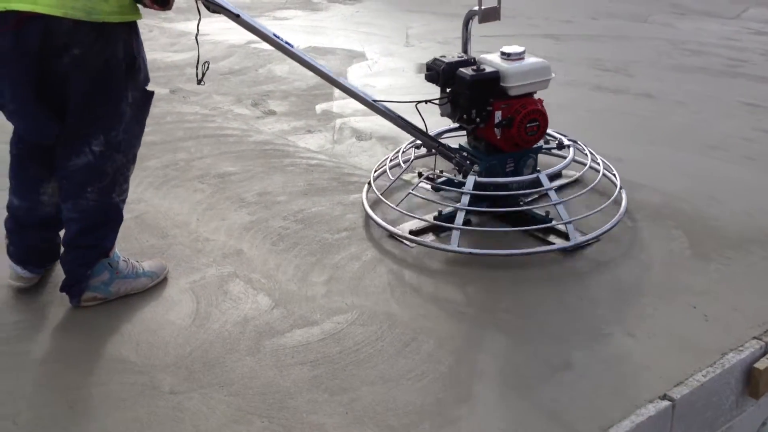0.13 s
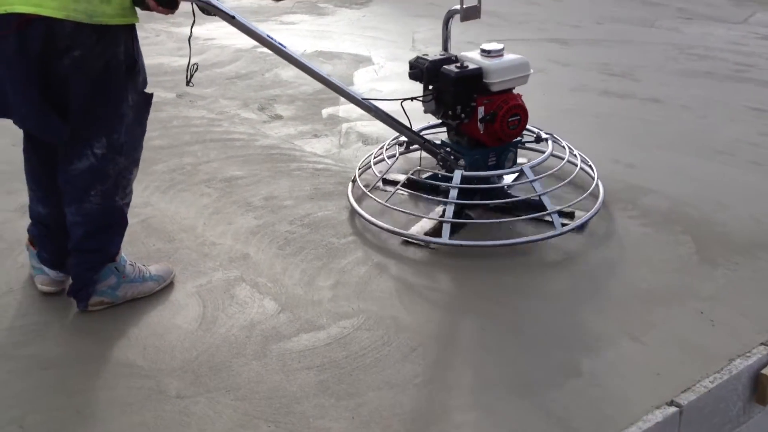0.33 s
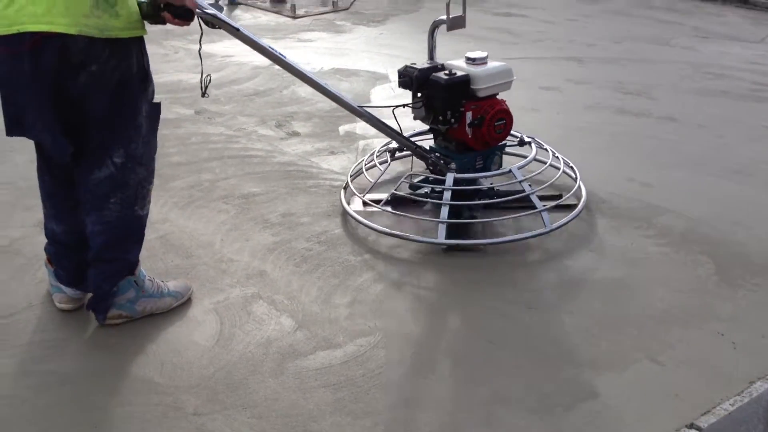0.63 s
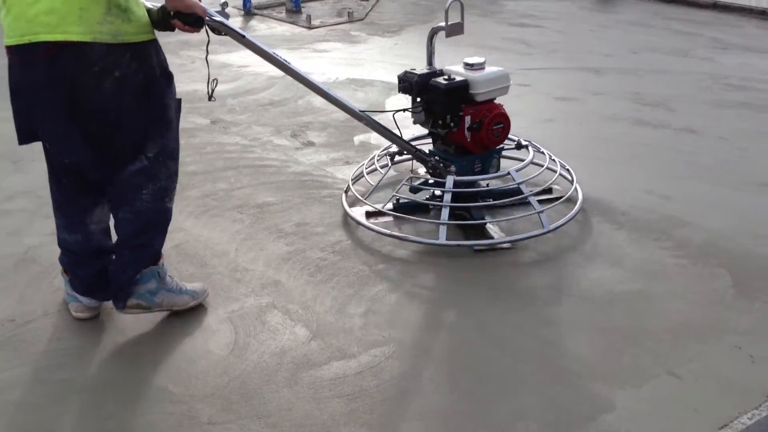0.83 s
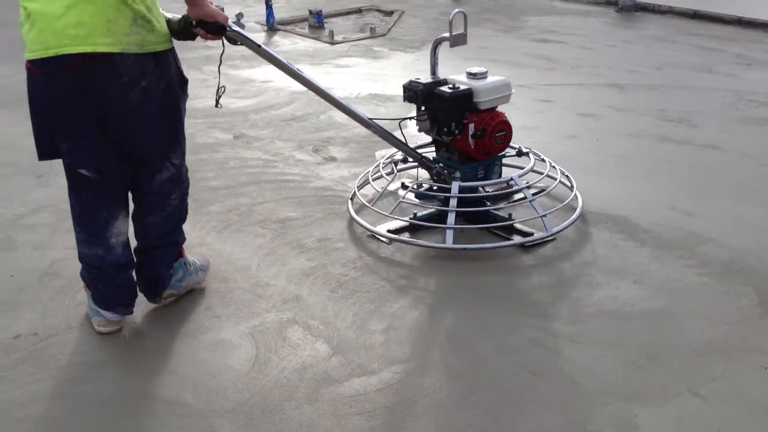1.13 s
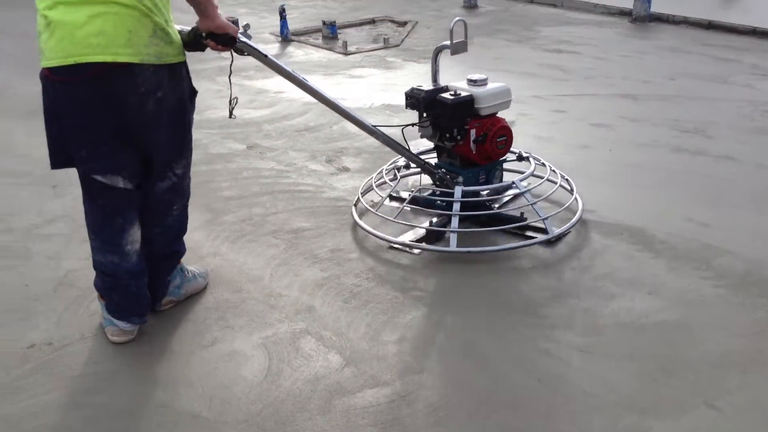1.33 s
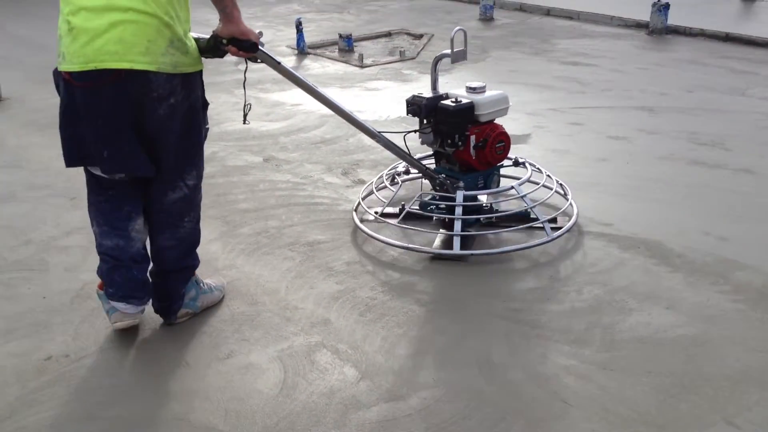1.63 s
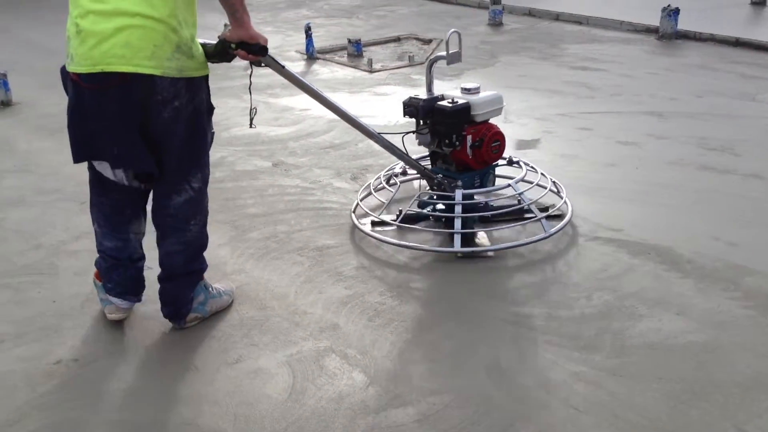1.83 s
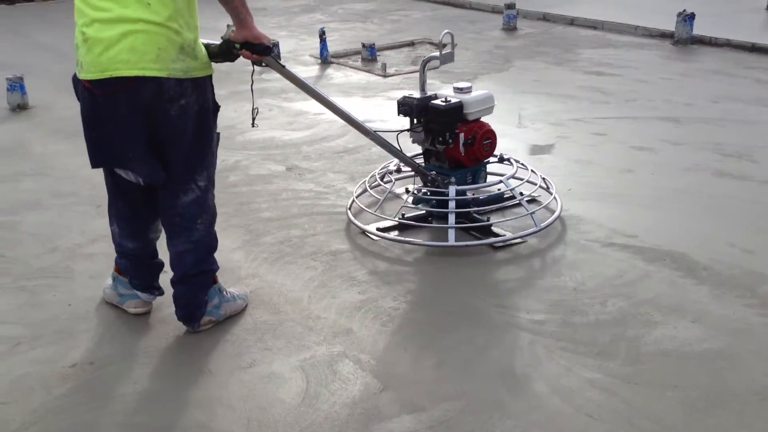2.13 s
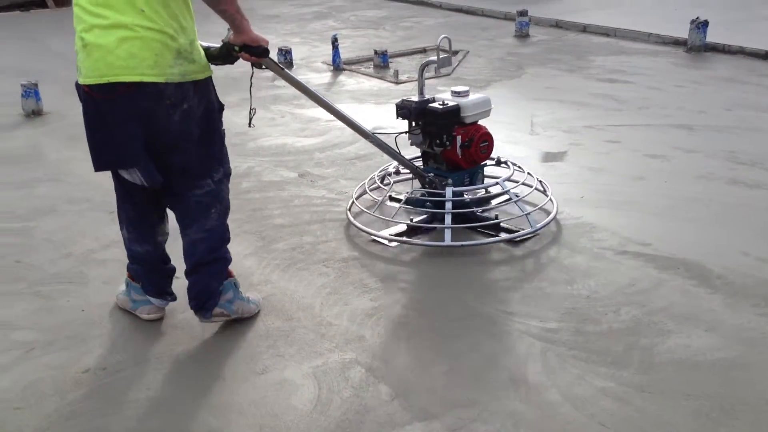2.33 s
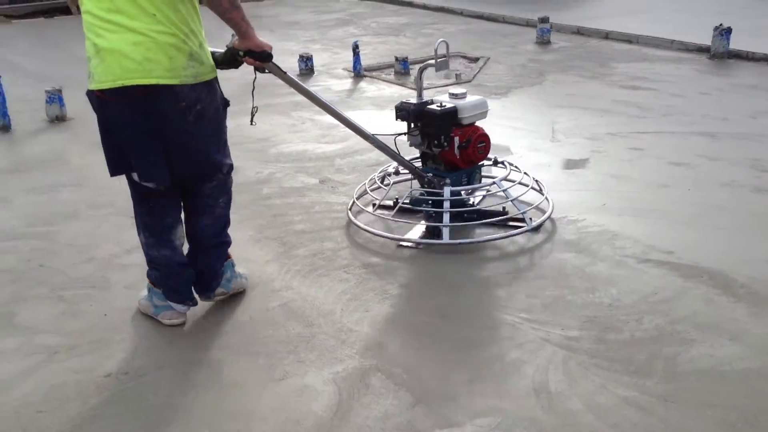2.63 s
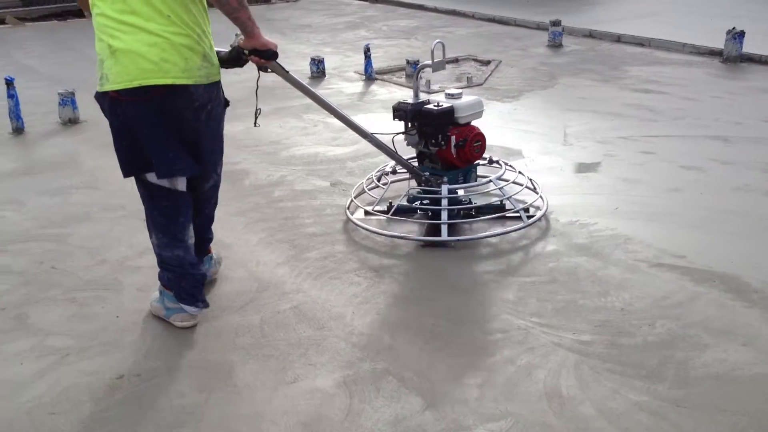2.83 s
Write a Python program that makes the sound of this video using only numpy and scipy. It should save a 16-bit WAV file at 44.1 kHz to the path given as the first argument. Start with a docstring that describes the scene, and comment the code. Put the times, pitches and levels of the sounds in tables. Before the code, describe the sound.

A small petrol engine runs continuously for about three seconds, its rough, buzzing drone pulsing about 31 times a second under dense metallic clatter. Steel blades add bright gritty hiss, swelling gently about eight times a second, fading to steadier. Sharp knocks and clacks scatter from 0.1 to 1.2 seconds, pause, then cluster duller from 2.1 to 2.9. Faint outdoor airflow and distant roar sit behind; mono, thin in deep bass.

```python
"""Outdoors, a wet concrete slab: a walk-behind power trowel heard by one microphone.
A single-cylinder four-stroke fires about 31 times a second: summed sine orders make the muffler drone,
random taps and one rap per firing ring casing resonances for the clatter.
Four steel blades sweep the slab: filtered random grains hiss, swelling with each pass; now and then
a blade knocks on a stone, as decaying sines. Shaped noise adds airflow and distant site roar."""
import sys
import numpy as np
from scipy import signal
from scipy.fft import rfft, irfft
from scipy.io import wavfile

SR = 44100
rng = np.random.default_rng(int(sys.argv[2]) if len(sys.argv) > 2 else 0)


def invert_db(x):
    """Field ratio 10**(x/20) for x, a level in decibels (scalar or array-like)."""
    u = np.asarray(x, float) / 20
    return 10 ** u


def file_out(sig):
    """Save sig as 16-bit WAV at sys.argv[1]."""
    # one column per channel
    cols = np.atleast_2d(sig).T
    # limit, then scale
    lim = np.clip(cols, -1, 1)
    pcm = np.round(lim * 32767).astype(np.int16)
    wavfile.write(sys.argv[1], SR, pcm)


N = 132300

# Engine speed. Each row: time in seconds, firings per second.
FIRING_RATE = [(0.05, 30.6), (0.43, 30.4), (0.59, 30.8), (1.34, 30.9), (1.49, 30.8), (2.22, 30.8),
               (2.55, 31.0), (2.79, 30.7), (2.95, 30.7)]
# Drone levels. Each row: time in seconds, base level of the minor orders, then levels of orders 5, 8, 11 in dB.
ORDER_LEVELS = [(0.05, -37, -34, -28.5, -39), (0.4, -36, -30.5, -26.5, -35.5), (0.59, -36, -32, -27, -33),
                (0.91, -32, -32, -29, -37), (1.76, -32, -29, -28.5, -33), (2.16, -33.5, -29, -28, -35),
                (2.4, -32, -28, -29.5, -31.5), (2.57, -30.5, -28.5, -30.5, -36.5),
                (2.88, -33.5, -29, -26, -29), (2.95, -33, -27.5, -27.5, -34.5)]
# Muffler spectrum. Each row: order (multiple of the firing rate), relative level in dB (unused for 5, 8, 11).
EXHAUST_ORDERS = [(1, -61), (2, -31.5), (3, -29), (4, -12), (5, -2), (6, -6.5), (7, -8.5), (8, 0), (9, -9),
                  (10, -6.5), (11, -4), (12, -17.5), (13, -14), (14, -16), (15, -39), (16, -18.5),
                  (17, -29), (19, -24), (20, -24), (21, -24.5)]
# Casing resonances. Each row: centre in Hz, width in Hz, relative gain in dB,
# share of the taps pulsing with each firing, lag behind the firing in cycles.
CASING_MODES = [(780, 79, -9.5, 0.15, 0.14), (870, 59, -2, 0.068, 0.03), (1023, 152, -5, 0.08, 0.3),
                (1380, 210, -16, 0.44, 0.085), (1480, 92, 4, 0.3, 0.14), (1507, 39, 8, 0.54, 0.42),
                (1715, 220, 0, 0.55, 0.5), (2130, 49, 2.5, 0.21, 0.35), (2304, 44, 11, 0.51, 0.4),
                (2377, 170, 0.5, 0.83, 0.12), (3300, 69, -4.5, 0.24, 0.42)]
# Relative clatter levels. Each row: time in seconds, level below 1.2 kHz, at 1.2-1.9 kHz, above, in dB.
CLATTER_LEVELS = [(0.05, -31, -33, -27), (0.16, -26.5, -31.5, -27), (0.29, -31, -26.5, -32),
                  (0.33, -27, -28, -31), (1.2, -27.5, -28.5, -25), (2.46, -31, -29.5, -27),
                  (2.9, -31, -27.5, -26.5), (2.95, -29, -27, -27)]
# Relative blade hiss levels. Each row: time in seconds, level below 6 kHz, at 6-9.5 kHz, above, in dB.
HISS_LEVELS = [(0.05, -28, -27.5, -29.5), (0.35, -27, -26, -27), (0.63, -28, -27, -28),
               (0.94, -29.5, -29, -29.5), (1.46, -29, -28, -31), (1.81, -28, -27.5, -29.5),
               (2.21, -29, -28.5, -31.5), (2.6, -28.5, -29, -30.5), (2.95, -28.5, -28, -31)]
# Hiss spectrum. Each row: frequency in Hz, relative density in dB per Hz.
HISS_SPECTRUM = [(1650, -14.5), (2800, -0.5), (3320, 0), (3540, -7.5), (3850, -1.5), (4220, -8),
                 (5150, -2.5), (6110, -4), (7240, -1), (8650, -6.5), (10200, -11), (10700, -9), (11500, -4),
                 (12200, -4), (14600, -12), (15200, -16.5)]
# Stone knocks. Each row: start in seconds, level in dB, extra level of blade modes above 3 kHz in dB,
# clack pitch in Hz, relative clack level in dB.
STONE_KNOCKS = [(.113, -4.5, -9, 850, -7), (.1655, -5, -9, 2370, -6), (.192, -10, -4, 924, -11),
                (.2455, -8.5, -1, 870, 1.5), (0.51, -13, -3, 1550, 4), (0.595, 0, -5.5, 984, -6),
                (.6935, -2.5, -3, 870, -3.5), (.93, -9.5, -0.5, 780, -0.5), (1.05, -3, -13, 1500, -9),
                (1.194, 0, -4.5, 1143, -6), (2.128, -5, -5, 1560, -0.5), (2.192, -5, -20, 2290, -2.5),
                (2.257, 2, -47, 1530, -25), (2.292, -7.5, -21, 966, -1), (2.337, -1, -23, 985, -23),
                (2.41, -9, -16, 946, 1), (2.416, -7.5, -20, 2310, 2), (2.643, -9, -24, 1272, 2.5),
                (2.688, -14.5, -13, 936, 3.5), (2.739, -4, -33, 1535, -9), (2.774, -1.5, -16, 1460, -21),
                (2.803, -19, -20, 1490, 5), (2.842, -3, -19, 1450, -7.5), (2.864, -3.5, -14, 1220, -1.5)]
# Blade modes. Each row: frequency in Hz, relative level in dB, 60 dB decay time in seconds.
BLADE_MODES = [(2313, -7, 0.024), (3140, -6.5, 0.018), (5190, 2.5, 0.0063), (6330, 3, 0.0058),
               (7070, -0.5, 0.013), (11500, 1, 0.0052)]
# Airflow and distant site. Each row: frequency in Hz, relative density in dB per Hz.
ROAR_SPECTRUM = [(30, -55), (60, -29), (95, -28), (135, -24), (200, -8.5), (250, -17), (340, -12),
                 (460, -20.5), (560, -19), (800, -16.5), (1900, -20.5), (2400, -6), (3500, -48),
                 (7700, -100)]


def in_time(rows):
    """Interpolate the columns of a time table, sample by sample."""
    s, *columns = np.transpose(rows)
    return [np.interp(np.arange(N) / SR, s, column) for column in columns]


def rms_one(x):
    """Scale to rms 1."""
    return x / np.sqrt(np.mean(x ** 2) + 1e-20)


def drift(corner_hz):
    """Slow random wander of spread 1: low-passed noise made at every 40th sample."""
    r = np.exp(-80 * np.pi * corner_hz / SR)
    noise = rng.standard_normal(N // 40 + 2002)
    slow = signal.lfilter([1], [1, -2 * r, r * r], noise)[2000:]
    return np.interp(np.arange(N) / 40, np.arange(len(slow)), rms_one(slow - slow.mean()))


def colour(x, spectrum):
    """Multiply a noise's spectrum by a table's curve; rms 1."""
    hz, db = np.transpose(spectrum)
    bins_hz = np.maximum(np.arange(N // 2 + 1) * SR / N, 1)
    gain = invert_db(np.interp(np.log(bins_hz), np.log(hz), db))
    return rms_one(irfft(rfft(x) * gain, N))


def grains(rate_per_s, spread_db):
    """Random clicks of uneven size; rms 1."""
    sizes = invert_db(spread_db * np.minimum(rng.exponential(1, N), 5)) * rng.standard_normal(N)
    return rms_one(sizes * (rng.random(N) < rate_per_s / SR))


def resonance(x, hz, width_hz):
    """Two-pole band-pass of gain 1."""
    r = np.exp(-np.pi * width_hz / SR)
    poles = [1, -2 * r * np.cos(2 * np.pi * hz / SR), r * r]
    return signal.lfilter([(1 - r * r) / 2, 0, (r * r - 1) / 2], poles, x)


def butter(x, order, edge_hz, kind):
    """Butterworth filter."""
    return signal.sosfilt(signal.butter(order, edge_hz, kind, fs=SR, output="sos"), x)


def drone(cycle):
    """Muffler note: sine orders of the firing rate, the minor ones wandering most in level and phase."""
    minor_db, strong_db, wander_per_s = 5.5, 3, 6
    strong_wander_db, minor_wander_db, minor_slip_rad = 1.1, 1.7, 0.2
    # phase lead growing with order squared: three puffs a cycle, each falling in pitch
    smear_rad = np.pi / 3 + 0.08
    base_db, *strong = in_time(ORDER_LEVELS)
    own_db = dict(zip((5, 8, 11), strong))
    burn_db = 1.3 * drift(18)  # uneven burns sway the orders above the 6th together
    out = 0
    for order, relative_db in EXHAUST_ORDERS:
        k = round(order)
        if k in own_db:
            level_db = own_db[k] + strong_db
            wander_db, slip = strong_wander_db, 0
        else:
            level_db = base_db + minor_db + relative_db
            wander_db, slip = minor_wander_db, minor_slip_rad * drift(wander_per_s)
        level_db = level_db + burn_db * (k > 6) + wander_db * drift(wander_per_s)
        phase = 2 * np.pi * k * cycle + smear_rad * k * k + slip
        out = out + invert_db(level_db) * np.sin(phase)
    return out


def clatter(cycle):
    """Valve gear and piston taps, swelling with each firing, and a combustion rap ring the casing."""
    taps_per_s, tap_spread_db = 3000, 2.5
    combustion_db, stroke_spread_db, patchy_db = -8, 1.5, 1.2
    low_cut_hz, clatter_db = 630, -1.5
    rap = np.diff(np.floor(cycle), prepend=0) * np.sqrt(SR / 31)  # about rms 1
    rap = rap * invert_db(combustion_db + stroke_spread_db * drift(19))
    strokes = invert_db(stroke_spread_db * rng.standard_normal(200))
    layers = np.zeros((3, N))
    for hz, width_hz, db, share, lag in CASING_MODES:
        gate = 1 + np.clip(share, 0, 1) * np.cos(2 * np.pi * (cycle - lag))
        stroke = strokes[(cycle - lag + 1.5).astype(int)]  # one size per firing
        taps = grains(taps_per_s, tap_spread_db) * gate * stroke
        ring = resonance(taps + rap, hz, width_hz)
        layers[np.searchsorted([1200, 1900], hz)] += invert_db(db + patchy_db * drift(12)) * ring
    layers = butter(layers, 4, low_cut_hz, "high")
    return sum(invert_db(clatter_db + db) * rms_one(x) for db, x in zip(in_time(CLATTER_LEVELS), layers))


def scuffs():
    """Amplitude of the scuff after every knock: a jump with exponential decay."""
    scuff_db, t60_s = -29.5, 0.15
    s, db, treble_db, *_ = np.transpose(STONE_KNOCKS)
    marks = np.zeros(N)
    marks[(s * SR).astype(int)] = invert_db(db + treble_db + scuff_db)
    return signal.lfilter([1], [1, -invert_db(-60 / (t60_s * SR))], marks + 1e-18)


def blades(cycle):
    """Grit hisses under the blades, swelling as each blade passes and after every knock."""
    grit_per_s, grit_spread_db = 20000, 1.6
    hiss_db, patchy_db, shake_share = 1, 1.13, 0.045
    sweep_db, sweep_fade_db_per_s, sweeps_per_s, first_sweep_s = 1.1, 0.25, 8.44, 0.601
    t = np.arange(N) / SR
    depth_db = np.maximum(sweep_db - sweep_fade_db_per_s * t, 0)
    sweep = depth_db * np.cos(2 * np.pi * sweeps_per_s * (t - first_sweep_s))
    shake = 1 + shake_share * np.cos(4 * np.pi * cycle)  # once per engine turn, two turns a firing
    scuff = scuffs()
    bands = ((6000, "low"), ([6000, 9500], "band"), (9500, "high"))
    out = 0
    for (edge_hz, kind), level_db in zip(bands, in_time(HISS_LEVELS)):
        grit = colour(grains(grit_per_s, grit_spread_db), HISS_SPECTRUM)
        grit = rms_one(butter(grit, 3, edge_hz, kind))
        rubbing = invert_db(level_db + hiss_db + sweep + patchy_db * drift(39)) * shake
        out = out + grit * (rubbing + scuff)
    return out


def clack(t, hz, db):
    """Dull clack: swells, then decays; a second mode just above roughens it."""
    clack_db, rise_s, t60_s = -5.5, 0.0025, 0.037
    neighbour_ratio, neighbour_db = 1.16, -4
    envelope = invert_db(db + clack_db - 60 * t / t60_s) * (1 - np.exp(-t / rise_s))
    low = np.sin(2 * np.pi * hz * t)
    high = invert_db(neighbour_db) * np.sin(2 * np.pi * neighbour_ratio * hz * t)
    return envelope * (low + high)


def knocks():
    """A blade edge strikes a stone, ringing its modes; a duller clack swells just after."""
    knock_db, contact_s = -3, 0.0003
    out, t = np.zeros(N + SR), np.arange(SR // 5) / SR
    for s, db, treble_db, clack_hz, clack_db in STONE_KNOCKS:
        hit = clack(t, clack_hz, clack_db)
        for hz, mode_db, t60_s in BLADE_MODES:
            ring = (1 - np.exp(-t / contact_s)) * np.sin(2 * np.pi * (hz * t + rng.random()))
            level_db = mode_db + knock_db + treble_db * (hz > 3000)
            hit = hit + invert_db(level_db - 60 * t / t60_s) * ring
        start = int(s * SR)
        out[start:start + len(t)] += invert_db(db) * hit
    return out[:N]


def roar():
    """Airflow and distant site: steady shaped noise."""
    roar_db = -28
    return invert_db(roar_db) * colour(rng.standard_normal(N), ROAR_SPECTRUM)


def scene():
    """All sources sum at one microphone, the same in both channels."""
    firings_per_s, = in_time(FIRING_RATE)
    cycle = np.cumsum(firings_per_s) / SR
    mix = drone(cycle) + clatter(cycle) + blades(cycle) + knocks() + roar()
    return np.tile(mix, (2, 1))


def top_cut(x):
    """Nothing passes above the cut-off."""
    return signal.sosfilt(signal.butter(12, 15740, fs=SR, output="sos"), x)


def record(dry):
    """The microphone loses the deep bass."""
    low_cut_hz = 77
    mix = butter(dry, 2, low_cut_hz, "high")
    return top_cut(mix)


dry = scene()
out = record(dry)
file_out(out)
```